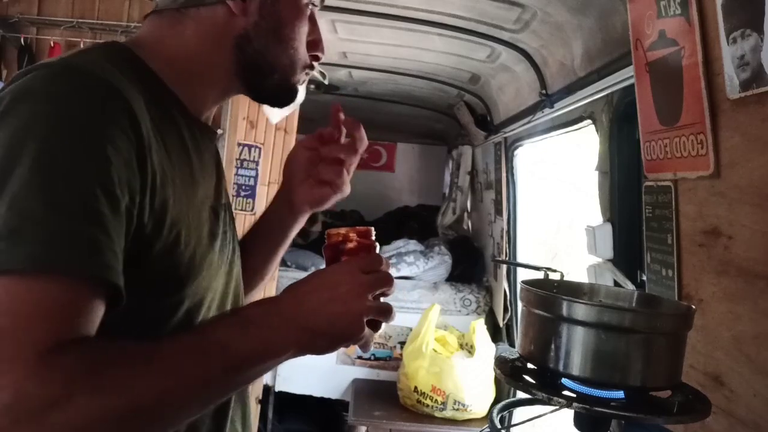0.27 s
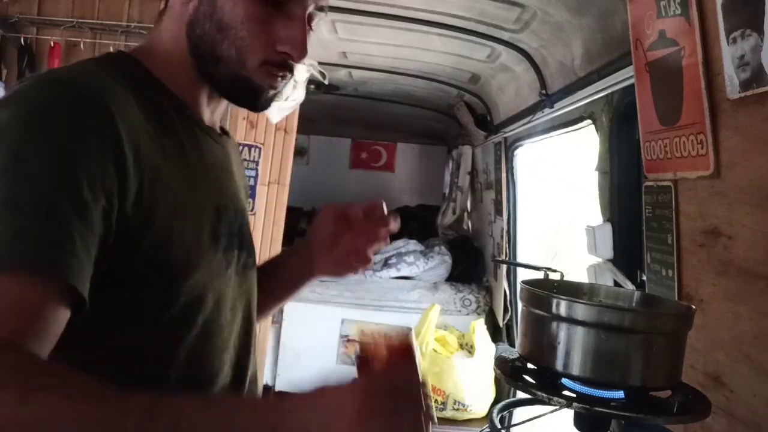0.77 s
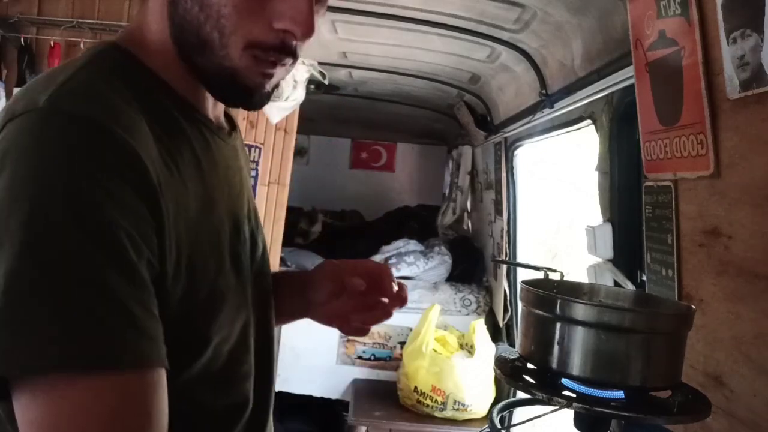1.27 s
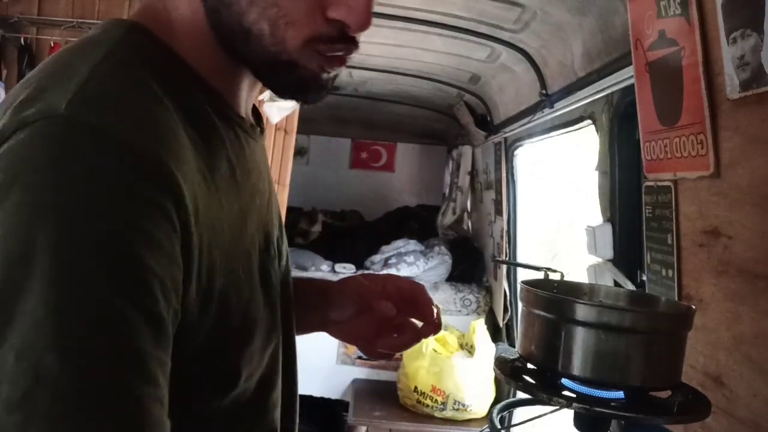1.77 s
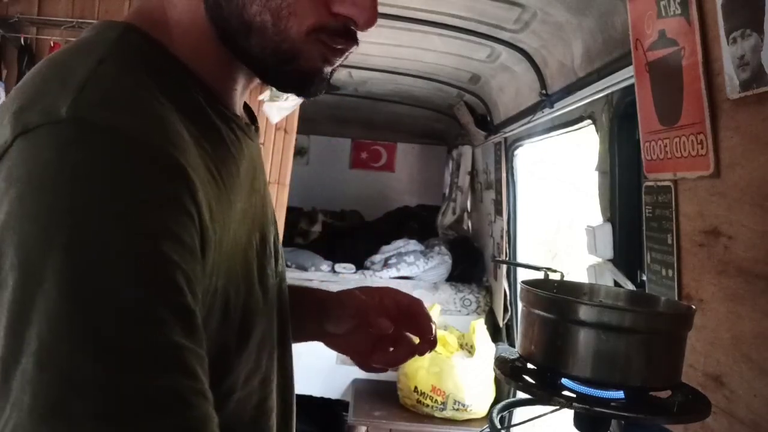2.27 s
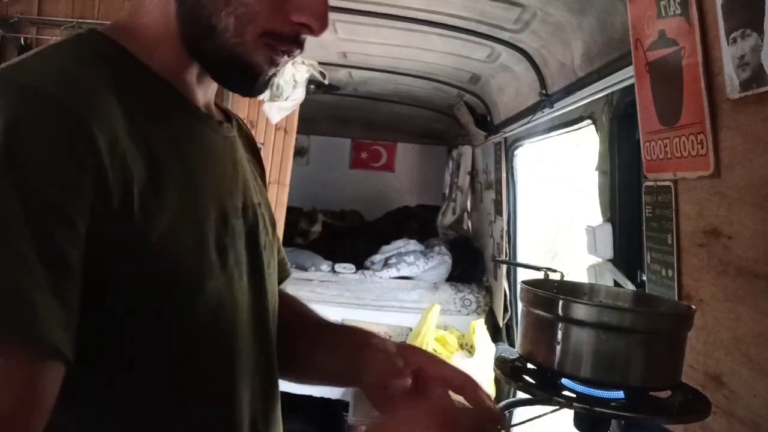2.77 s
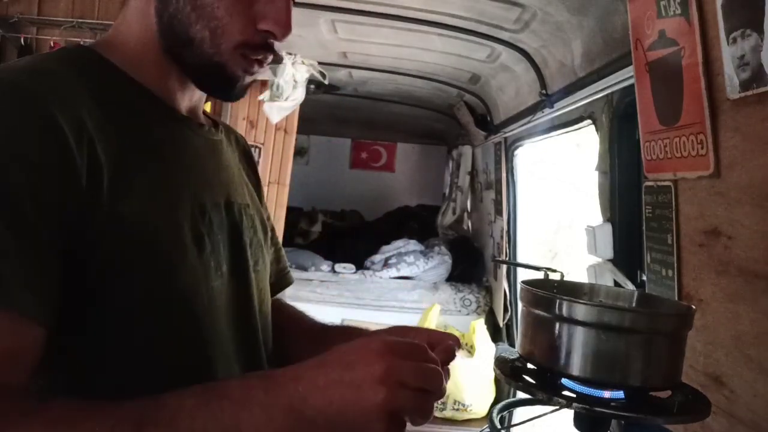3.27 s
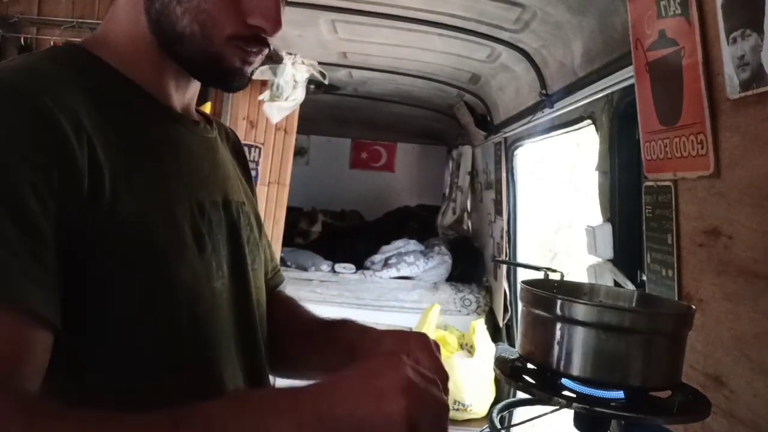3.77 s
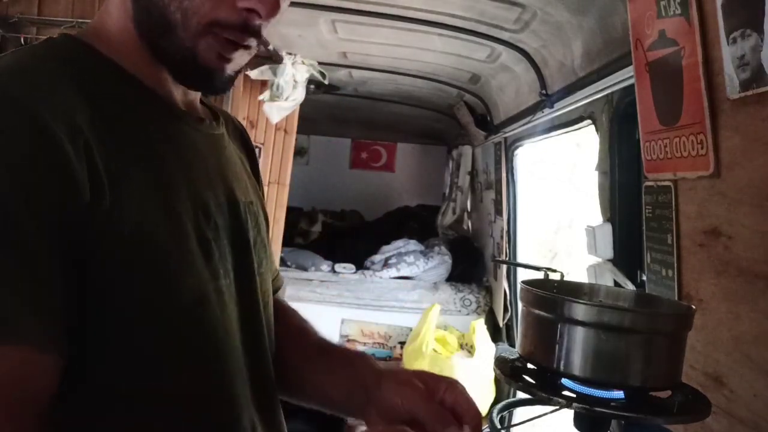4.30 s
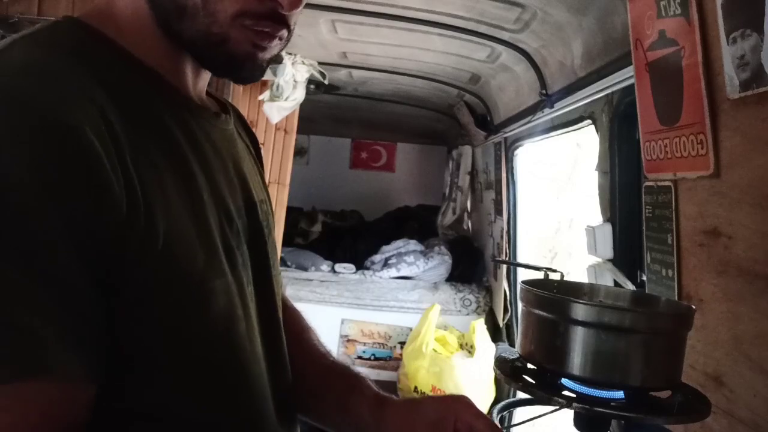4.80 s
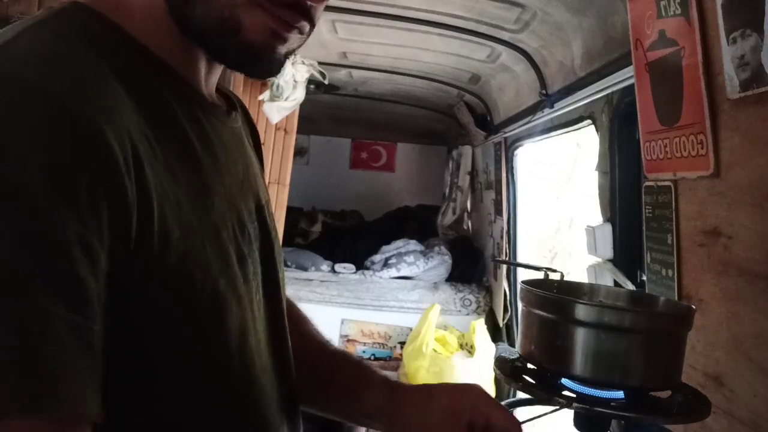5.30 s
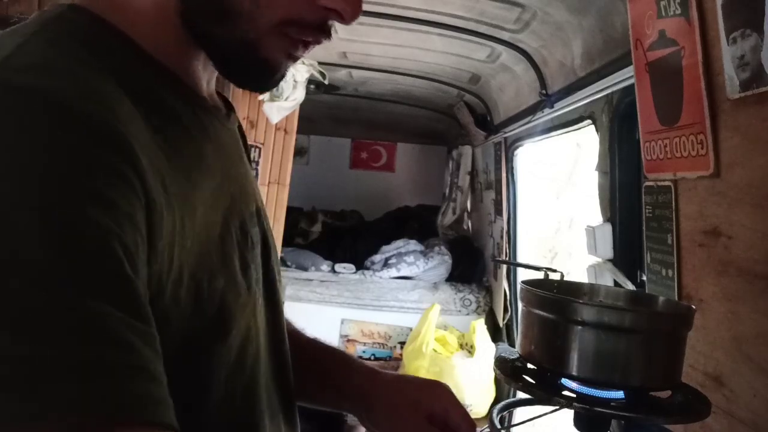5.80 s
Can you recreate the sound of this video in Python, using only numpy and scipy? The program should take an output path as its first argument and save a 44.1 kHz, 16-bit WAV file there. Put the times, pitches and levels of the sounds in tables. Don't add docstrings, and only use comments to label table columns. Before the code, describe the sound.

A gas ring burns steadily under a steel pot, a low fluttering rumble with a thin soft hiss above it. Early on, a jar lands on a wooden worktop with a dull double knock and a softer rebound. Around and after it, fingers make faint dry ticks, snaps and wrapping crinkles. Close stereo microphone in a small padded van interior, with a short, dry tail.

```python
import sys
import numpy as np
from scipy import signal
from scipy.fft import rfft, irfft
from scipy.io import wavfile

SR = 44100
rng = np.random.default_rng(int(sys.argv[2]) if len(sys.argv) > 2 else 0)


def to_linear_factor(level_db):
    exponent = np.asarray(level_db, float) / 20
    return 10 ** exponent


def persist_wave(psi):
    counts = np.round(np.clip(psi, -1, 1) * 32767).astype(np.int16)
    wavfile.write(sys.argv[1], SR, np.atleast_2d(counts).T)


N = 266805

# time in seconds, vigour in dB.
DRAUGHT = [
    (0, 2.5),
    (.3, -2),
    (1.3, 1.5),
    (2.1, 1.5),
    (3.8, -1),
    (4.4, 0),
    (5.1, -.5),
    (6.05, 1),
]
# frequency in Hz, density in dB per Hz.
FLAME_SPECTRUM = [(15, -69), (25, -50), (48, -31), (58, -28), (104, -3.5), (240, 0.5), (280, -2),
                  (356, -15.5), (452, -7.5), (585, -17), (615, -20.5), (913, -28.5), (994, -40),
                  (1500, -47), (1950, -90), (3300, -120)]
# frequency in Hz, side minus mid in dB.
FLAME_SIDE = [(30, 6), (130, -29), (290, -9), (450, -12), (700, -3), (1000, -7)]
# frequency in Hz, density in dB per Hz.
HISS_SPECTRUM = [(500, -0.5), (1000, 1.5), (1600, 0), (2600, -2.5), (3300, 0.5), (4500, -5.5), (5100, -4.5),
                 (7400, 2), (8000, -7.5), (12500, -11), (13200, -5), (15500, -1)]
# frequency in Hz, width in Hz, level in dB,
# left minus right in dB, right lead in rad.
HOLLOWS = [(3780, 870, 7, -2.5, 2), (4120, 720, 3, 3.5, .5), (4575, 130, 5, -1, 0.57),
           (5367, 103, 4, 13, 1.5), (5550, 55, 2, -11, -4.5), (6377, 336, 6, 6, -1.5),
           (7500, 720, -8, 15.5, 1), (8390, 117, 1.5, -13, 4), (13300, 210, -6.5, -19, -1.5),
           (14400, 300, 2.5, -1, 1)]
# top in seconds, level in dB, half length in seconds.
SWELLS = [
    (1.8, -67.5, 1),
    (5.103, -61, 0.52),
    (5.9, -67, 0.4),
]
# start in seconds, level in dB.
PATS = [(1.0285, -55.5), (1.2061, -49.5), (1.3419, -55.5), (1.446, -42), (1.6115, -57), (1.898, -60.5),
        (1.939, -57), (1.95, -60), (2.598, -60), (3.0494, -62), (4.085, -56), (4.258, -61), (4.267, -72),
        (4.9172, -58), (5.0044, -62), (5.682, -55), (5.872, -62)]
# start in seconds, level in dB, ring in Hz, brightness in dB.
SNAPS = [(1.157, -45.5, 2500, -21), (1.8102, -58, 4030, 1.5), (1.9384, -60, 1990, -13),
         (1.9495, -46, 3260, -17), (2.507, -48.5, 1950, 2), (2.51, -51, 3700, -10), (2.558, -65, 2100, -12),
         (2.6, -66, 2100, -10), (2.617, -61, 2300, -1), (3.277, -43, 2800, -6.5), (4.0445, -48, 2260, -7),
         (4.084, -53.5, 2040, -15), (4.1057, -57, 4050, 2.5), (4.911, -50.5, 4000, -4),
         (5.0044, -58, 2050, 1), (5.023, -64, 2150, -7), (5.233, -64, 2450, -8), (5.7292, -62, 2110, 8.5),
         (5.745, -64, 2300, -6), (5.784, -59, 3940, -5), (5.828, -61, 2200, -8), (5.873, -59, 2000, -8),
         (5.905, -65, 2250, -8)]
# start in seconds, level in dB, thinness in dB.
CRINKLES = [(1.157, -61.5, 14), (1.188, -58.5, -11), (1.2061, -52, -4.5), (1.437, -52, -22.5),
            (2.1808, -59.5, -8), (3.2699, -50, -19), (3.299, -56, -19), (4.0385, -48, -11),
            (4.221, -54, -13), (4.8525, -48, -5), (4.9172, -45, -10), (4.968, -53.5, -1), (4.9874, -52, -2),
            (5.3656, -50.5, -13), (5.785, -66, 8), (5.8043, -51.5, -7), (5.8294, -59.5, 4),
            (5.873, -52, -12), (5.8807, -63, 5)]
# frequency in Hz, width in Hz, level in dB.
HANDLED_BODY = [(970, 560, 12), (2086, 180, 3.5), (2300, 190, 9.5), (3180, 780, 14), (3900, 260, -4),
                (4990, 160, -18), (6250, 250, 7.5), (7120, 720, 12.5)]
# start in seconds, level in dB.
BUMPS = [
    (1.055, -28),
    (1.066, -35),
    (1.604, -38),
    (1.667, -37.5),
    (4.798, -43),
    (4.853, -41),
]
# start in seconds, level in dB, contact low-pass in Hz.
BLOWS = [
    (1.34, -34, 400),
    (1.433, -16, 1100),
    (1.4412, -13, 410),
    (1.604, -20.5, 220),
    (1.6096, -23.5, 390),
    (1.638, -49, 200),
    (2.603, -42, 300),
]
# frequency in Hz, level in dB, T60 in seconds.
WORKTOP_MODES = [(91, -5, 0.025), (134, -25.5, 0.15), (141.3, -26.5, 0.73), (160.7, 0.5, 0.12),
                 (168.6, -18, 0.32), (200, -7.5, 0.057), (260.5, -4, 0.074), (295, -4.5, 0.21),
                 (370, -8, 0.068), (453, -6.5, 0.18), (550, -5.5, 0.08), (631, -2.5, 0.058),
                 (697, -15, 0.12), (790, -8, 0.025), (910, -15.5, 0.068), (956, -8.5, 0.073),
                 (1054, -15, 0.062), (1140, -34, 0.039), (1310, -20.5, 0.03), (1446, -14, 0.063)]
# frequency in Hz, level in dB, T60 in seconds.
CUPBOARD_MODES = [(70.4, -12, 0.11), (107, 1.5, 0.097), (154, -6.5, 0.19)]
# frequency in Hz, level in dB, T60 in seconds.
TAP_MODES = [(680, -4, 0.041), (860, 7.5, 0.028), (965, -17, 0.037), (1080, -7, 0.046), (1330, 1.5, 0.015),
             (1520, -1, 0.034), (1550, -2, 0.021), (1840, -13, .03), (2020, -4, 0.022), (2380, -20, .04)]
# frequency in Hz, level in dB, T60 in seconds.
BIT_MODES = [(2074, 13.5, 0.053), (2370, -38, 0.018), (3070, 1, 0.046), (3400, 8, 0.035), (4300, -10, .02),
             (5330, -10, .02)]
# start, top, easing and end in seconds.
SCUFF_S = (5.186, 5.204, 5.213, 5.222)
# 4.6-8.2 kHz, 1-6.5 kHz and 11.6-16 kHz, all in dB.
SCUFF_DB = (-41, -42.5, -47)
# frequency in Hz, left minus right in dB.
HANDS_TILT = [(3000, 0.5), (6500, 2.5), (9000, -3.5), (13000, -6.5)]
# frequency in Hz, gain in dB.
PORTS = [(100, 1), (8520, -5), (8620, -7.5), (9600, -14.5), (11000, -20.5), (11250, -20), (11500, -18),
         (11650, -3), (15700, -8.5), (15850, -32)]

RUMBLE_DB, HISS_DB = -45, -59
HISS_FOLLOWS = 0.11
RUMBLE_PAN_DB, LEFT_LAG_S = -2, 0.00013
MURMUR_HZ, MURMUR_WIDTH_HZ = 683, 64
TICK_RISE_S, TICK_T60_S = 0.0011, 0.036
SNAP_THUD_DB, SNAP_SPARKLE_DB = -8.5, -11
CRINKLE_THUD_DB, CRINKLE_SNAP_DB, FILM_HZ = -18.5, -11.5, 4060
PAT_SNAP_DB, PAT_CRINKLE_DB, PAT_SPARKLE_DB, BOARD_HZ = -8.5, -9.5, -26.5, 3700
TAP_S, TAP_DB = 4.2473, -38
BIT_DB, BIT_FALL_DB_PER_OCTAVE = -5.5, 10
VAN_T60_S, VAN_DB = 0.14, -11.5


def rms_one(x):
    return x / np.sqrt(np.mean(x ** 2) + 1e-20)


def at_hz(points, hz):
    points_hz, points_db = np.transpose(points)
    return np.interp(np.log(hz), np.log(points_hz), points_db)


def bins_hz():
    return np.maximum(np.fft.rfftfreq(N, 1 / SR), 1)


def coloured(x, points):
    return irfft(rfft(x) * to_linear_factor(at_hz(points, bins_hz())), N)


def drift(rate_hz):
    r = np.exp(-80 * np.pi * rate_hz / SR)
    slow = signal.lfilter([1], [1, -2 * r, r * r], rng.standard_normal(N // 40 + 2002))[2000:]
    return np.interp(np.arange(N) / 40, np.arange(len(slow)), rms_one(slow))


def band(x, low_hz, high_hz):
    return signal.sosfilt(signal.butter(2, [low_hz, high_hz], "band", fs=SR, output="sos"), x)


def resonance(x, hz, width_hz):
    r = np.exp(-np.pi * width_hz / SR)
    poles = [1, -2 * r * np.cos(2 * np.pi * hz / SR), r * r]
    return signal.lfilter(np.array([1, 0, -1]) * (1 - r * r) / 2, poles, x)


def struck(modes, own_db, contact_hz):
    t = np.arange(SR // 2) / SR
    rings = np.zeros((2, len(t)))
    for k, (hz, level_db, t60_s) in enumerate(modes):
        sense = (-1) ** k
        port_phase = sense * min(hz / 1200, 1) ** 2 * np.array([[.9], [-.9]])
        decay = to_linear_factor(level_db + own_db[k] - 60 * t / t60_s)
        rings += sense * decay * np.sin(2 * np.pi * hz * t + port_phase)
    onset = 1 - np.exp(-t / 0.00021)
    return signal.sosfilt(signal.butter(2, contact_hz, fs=SR, output="sos"), rings * onset)


def place(out, s, sound):
    out[:, round(s * SR):][:, :sound.shape[1]] += sound


def rumble(flutter_db, slow_db):
    flutter = to_linear_factor(flutter_db * drift(23) + slow_db * drift(0.7))
    mid, side = rng.standard_normal((2, N)) * flutter
    mid = coloured(mid, FLAME_SPECTRUM)
    side = coloured(coloured(side, FLAME_SPECTRUM), FLAME_SIDE)
    pair = np.array([mid + side, mid - side]) / np.std(mid)
    return pair * to_linear_factor([[RUMBLE_PAN_DB / 2], [-RUMBLE_PAN_DB / 2]])


def hiss(flutter_db):
    out = coloured(rng.standard_normal((2, N)), HISS_SPECTRUM)
    jets = rng.standard_normal((2, N))
    for k, (hz, width_hz, level_db, pan_db, lead_rad) in enumerate(HOLLOWS):
        narrow = resonance(resonance(jets[k % 2], hz, width_hz), hz, 0.89 * width_hz)
        tone = signal.hilbert(narrow) * to_linear_factor(level_db + 2 + flutter_db * drift(13.5))
        out[0] += to_linear_factor(pan_db / 2) * (tone * np.exp(-1j * lead_rad)).real
        out[1] += to_linear_factor(-pan_db / 2) * tone.real
    return out / np.std(band(out.mean(axis=0), 3120, 6800))


def murmur():
    t = np.arange(N) / SR
    noise = rng.standard_normal((2, N))
    for _ in range(2):
        noise = resonance(noise, MURMUR_HZ, MURMUR_WIDTH_HZ)
    swell = sum(to_linear_factor(level_db) * np.exp(-((t - s) / half_s) ** 2) for s, level_db, half_s in SWELLS)
    return swell * rms_one(noise)


def touches():
    snaps = [(s, hz, db + SNAP_THUD_DB, db, db + bright_db, db + bright_db + SNAP_SPARKLE_DB)
             for s, db, hz, bright_db in SNAPS]
    crinkles = [(s, FILM_HZ, db + CRINKLE_THUD_DB - max(thin_db, 0), db + CRINKLE_SNAP_DB, db, db + thin_db)
                for s, db, thin_db in CRINKLES]
    pats = [(s, BOARD_HZ, db, db + PAT_SNAP_DB, db + PAT_CRINKLE_DB, db + PAT_SPARKLE_DB) for s, db in PATS]
    return snaps + crinkles + pats


def handled(burst):
    return burst + sum(to_linear_factor(level_db) * resonance(burst, hz, width_hz)
                       for hz, width_hz, level_db in HANDLED_BODY)


def add_shares(out, s, burst, shares):
    stretch = out[:, round(s * SR):][:, :burst.shape[1]]
    for low_hz, high_hz, level_db in shares:
        part = band(band(burst, low_hz, high_hz), low_hz, high_hz)
        part = to_linear_factor(level_db) * part / np.std(part[:, :400].mean(axis=0))
        stretch += part[:, :stretch.shape[1]]


def ticks(likeness):
    out, t = np.zeros((2, N)), np.arange(SR // 8) / SR
    for s, ring_hz, thud_db, snap_db, crinkle_db, sparkle_db in touches():
        shared, left, right, grain = rng.standard_normal((4, len(t)))
        common = np.array([shared, np.roll(shared, 7)])
        noise = likeness * common + (1 - likeness) * np.array([left, right])
        envelope = to_linear_factor(1.9 * grain - 60 * t / TICK_T60_S) * (1 - np.exp(-t / TICK_RISE_S))
        burst = handled(noise * envelope)
        burst = burst + to_linear_factor(4.5) * resonance(burst, ring_hz, 490)
        add_shares(out, s - .002, burst, [(566, 1820, thud_db), (1900, 5100, snap_db),
                                          (4860, 8600, crinkle_db), (11300, 18300, sparkle_db)])
    return out


def knocks():
    out = np.zeros((2, N))
    scatter_db = rng.normal(0, 2.5, (len(BLOWS), len(WORKTOP_MODES)))
    for (s, blow_db, contact_hz), own_db in zip(BLOWS, scatter_db):
        place(out, s, -to_linear_factor(blow_db) * struck(WORKTOP_MODES, own_db, contact_hz))
    for s, bump_db in BUMPS:
        place(out, s, to_linear_factor(bump_db) * struck(CUPBOARD_MODES, np.zeros(len(CUPBOARD_MODES)), 220))
    place(out, TAP_S, to_linear_factor(TAP_DB + 2.0) * struck(TAP_MODES, np.zeros(len(TAP_MODES)), 2500))
    return signal.sosfilt(signal.butter(4, 70, "high", fs=SR, output="sos"), out)


def bits():
    out, modes_hz = np.zeros((2, N + SR)), np.array(BIT_MODES)[:, 0]
    scatter_db = rng.normal(0, 2.5, (len(SNAPS), len(BIT_MODES)))
    for (s, snap_db, ring_hz, _), own_db in zip(SNAPS, scatter_db):
        away_db = BIT_FALL_DB_PER_OCTAVE * np.abs(np.log2(modes_hz / ring_hz))
        place(out, s, to_linear_factor(snap_db + BIT_DB) * struck(BIT_MODES, own_db - away_db, 7000))
    return out[:, :N]


def scuff():
    crinkle_db, snap_db, sparkle_db = SCUFF_DB
    swell = np.interp(np.arange(N) / SR, SCUFF_S, [0.024, 0.89, 0.36, 0.038])
    shared, own, grain = rng.standard_normal((3, N))
    grains = handled(np.array([shared + own, shared - 0.81 * own]) * to_linear_factor(6.5 * grain))
    shares = [(4640, 8200, crinkle_db), (1000, 6500, snap_db), (11600, 16000, sparkle_db)]
    return swell * sum(to_linear_factor(level_db) * rms_one(band(grains, low_hz, high_hz))
                       for low_hz, high_hz, level_db in shares)


def left_late(pair):
    delay = np.exp(-2j * np.pi * bins_hz() * LEFT_LAG_S)
    return np.array([irfft(rfft(pair[0]) * delay, N), pair[1]])


def van(x):
    t = np.arange(SR // 3) / SR
    tail = rng.standard_normal((2, len(t))) * to_linear_factor(-60 * t / VAN_T60_S) * (t > .004)
    tail = to_linear_factor(VAN_DB) * tail / np.linalg.norm(tail[0])
    return x + signal.fftconvolve(x, tail, axes=1)[:, :N]


def scene():
    vigour_db = np.interp(np.arange(N) / SR, *np.transpose(DRAUGHT))
    flame = to_linear_factor(RUMBLE_DB + vigour_db) * rumble(flutter_db=0.5, slow_db=-1.46)
    jets = to_linear_factor(HISS_DB + HISS_FOLLOWS * vigour_db) * hiss(flutter_db=1.84)
    worktop = van(knocks() * to_linear_factor([[-.8], [.8]]))
    water = murmur()
    tilt = to_linear_factor(at_hz(HANDS_TILT, bins_hz()) * np.array([[.5], [-.5]]))
    fingers = irfft(rfft(scuff() + ticks(likeness=0.47) + bits()) * tilt, N)
    return jets + water + left_late(flame + worktop) + van(fingers)


def patchy(x, depth_db):
    edges_hz = np.arange(8600, 11600, 290)
    shut = np.zeros_like(x)
    for low_hz, high_hz in zip(edges_hz, edges_hz[1:]):
        opening = np.minimum(to_linear_factor(depth_db * drift(8.1)), 2)
        shut += (1 - opening) * band(x, low_hz, high_hz)
    return x - shut


def low_pass(x):
    return signal.sosfilt(signal.butter(12, 15840, fs=SR, output="sos"), x)


def record(dry):
    mix = coloured(patchy(dry, depth_db=9.0), PORTS)
    return low_pass(mix)


dry = scene()
out = record(dry)
persist_wave(out)
```